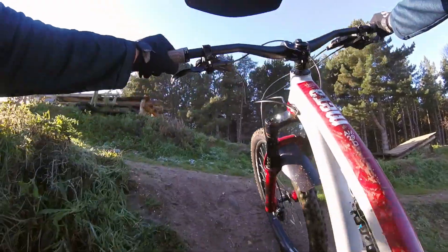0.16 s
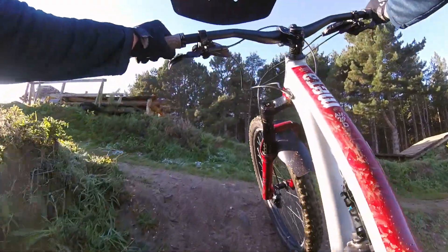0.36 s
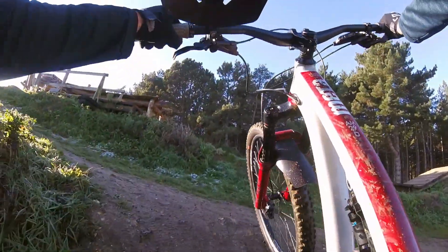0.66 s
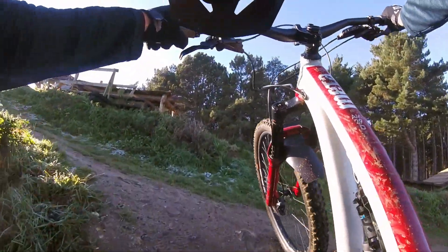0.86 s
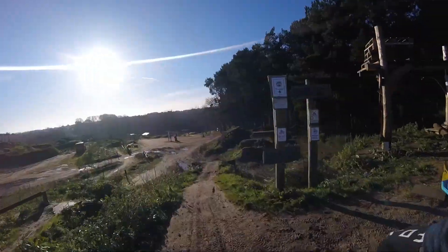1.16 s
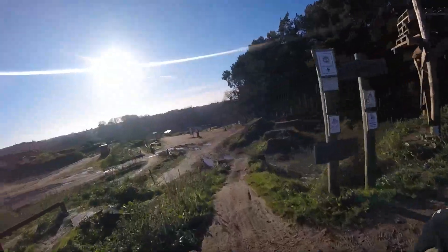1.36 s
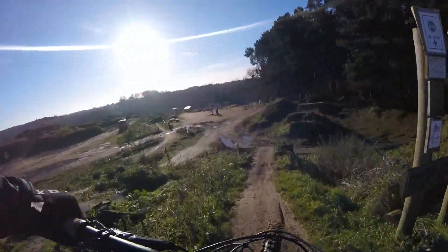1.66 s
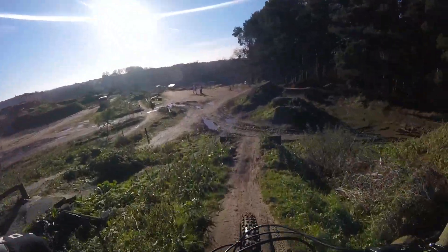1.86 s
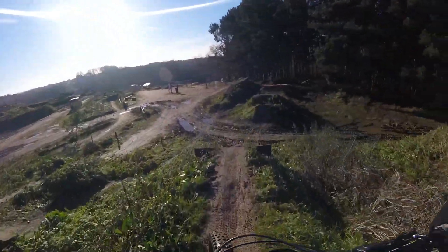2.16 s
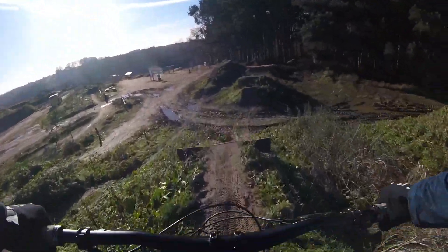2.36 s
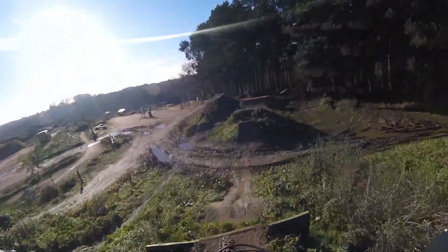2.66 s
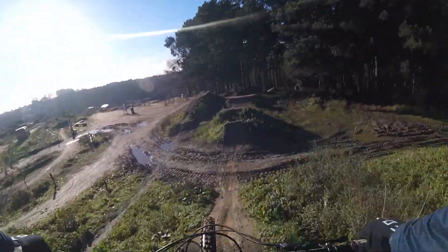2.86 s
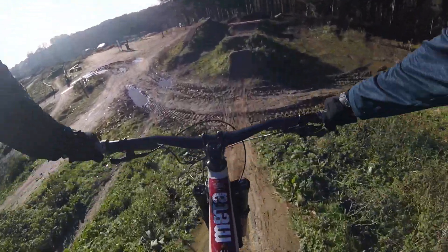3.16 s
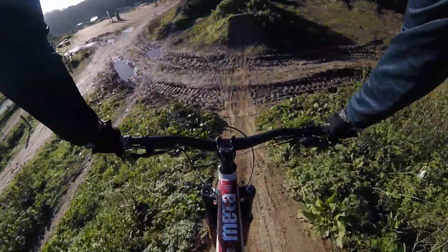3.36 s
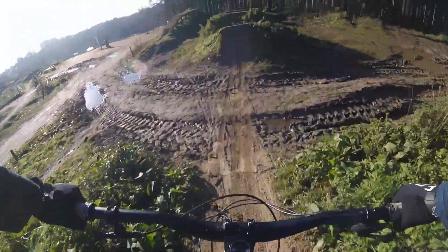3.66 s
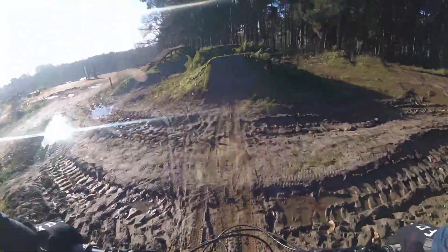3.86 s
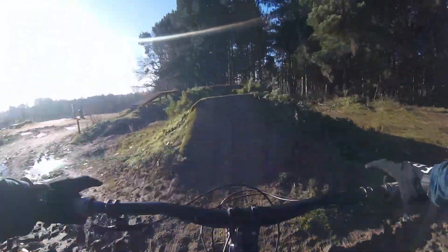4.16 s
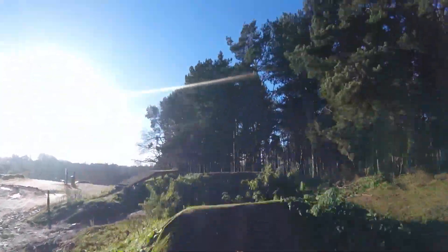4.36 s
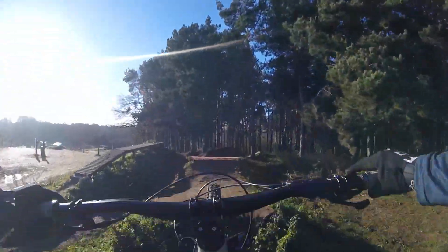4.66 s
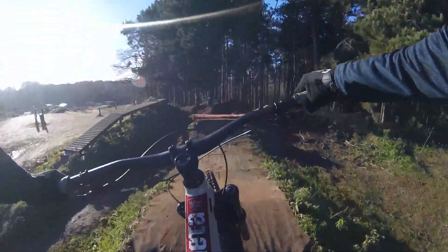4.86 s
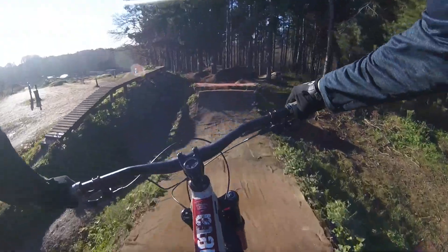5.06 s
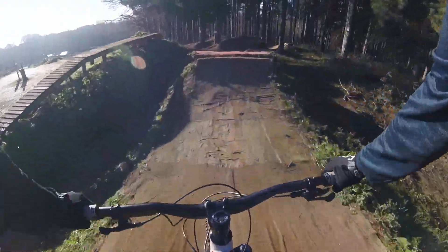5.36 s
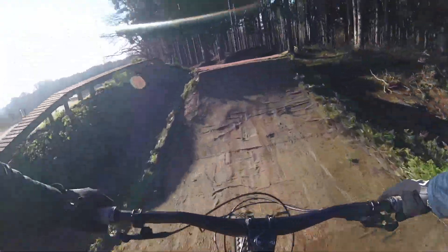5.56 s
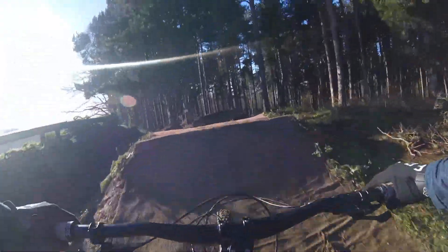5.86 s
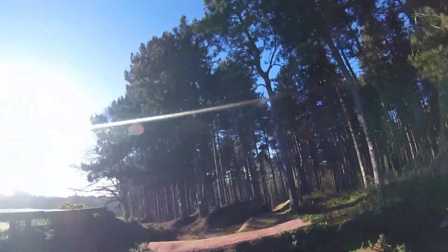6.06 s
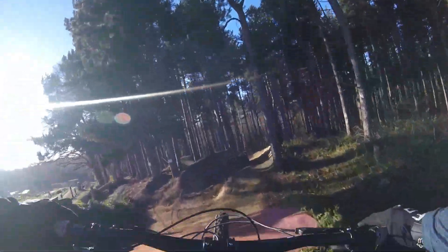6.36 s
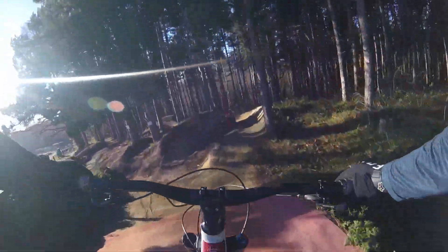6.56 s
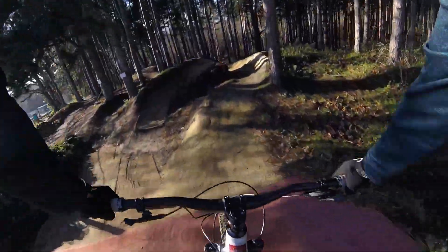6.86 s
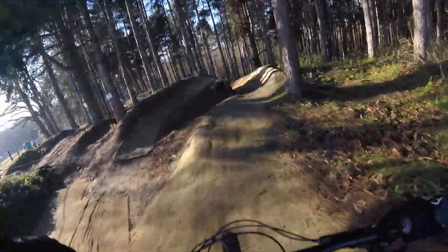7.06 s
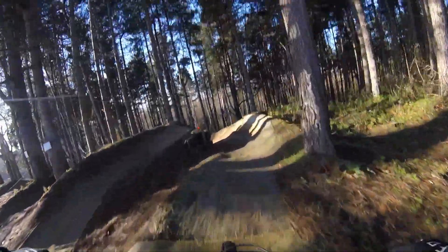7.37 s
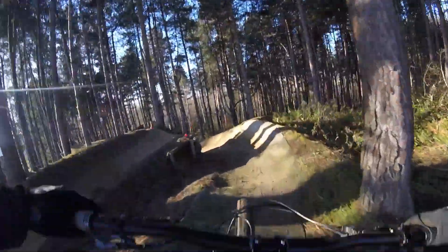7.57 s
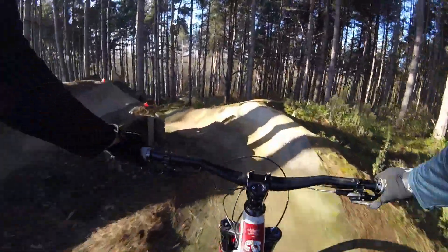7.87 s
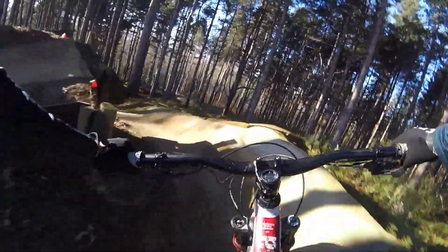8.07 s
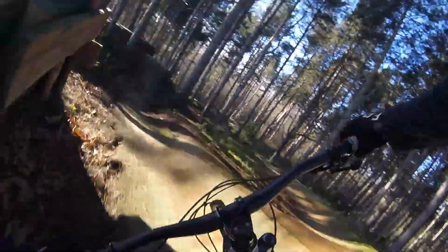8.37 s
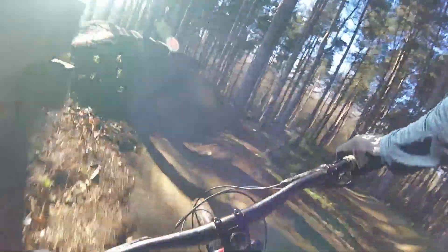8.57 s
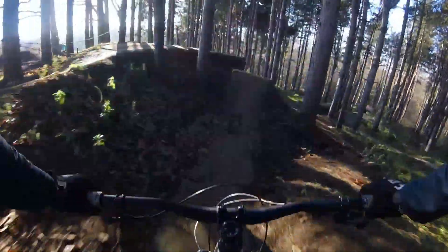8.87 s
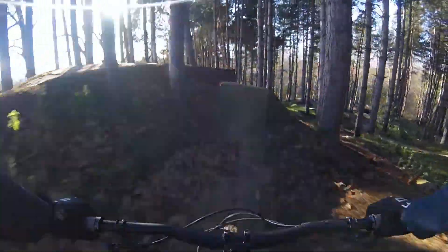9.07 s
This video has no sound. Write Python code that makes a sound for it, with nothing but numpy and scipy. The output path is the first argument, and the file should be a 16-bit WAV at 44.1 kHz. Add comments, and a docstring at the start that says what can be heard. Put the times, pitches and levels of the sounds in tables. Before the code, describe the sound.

A mountain bike's freehub ticks, then buzzes as the tyres roar over dirt and three jumps, with wind thumping on the microphone.

```python
"""Mountain bike on a dirt trail

Heard from a small cased camera on the rider: the freehub ticks as the wheel slows, then the bike runs
over packed dirt with three jumps. Turbulent wind rumbles and thumps on the microphone port; the tyres
roar, crunch and spit grit. Pawl impacts ring the hub, a buzz that is clearest while the wheels are in
the air. The cavity resonances of the case colour the pawls, grit and rattles."""
import sys
import numpy as np
from scipy import signal
from scipy.fft import rfft, irfft
from scipy.io import wavfile
from scipy.ndimage import uniform_filter1d

SR = 44100
rng = np.random.default_rng(int(sys.argv[2]) if len(sys.argv) > 2 else 0)


def int16_out(signal):
    """Quantize to a 16-bit WAV file."""
    q = np.round(np.clip(np.atleast_2d(signal).T, -1, 1) * 32767)
    wavfile.write(sys.argv[1], SR, q.astype(np.int16))


N = 406161

# faint wavering tones: (start [s], end [s], first pitch [Hz], last pitch [Hz], level [dB])
HUMS = [(0.242, 0.85, 360, 383, -53), (4.97, 5.322, 858, 913, -64)]
# wind on the port: (time [s], rumble [dB], buffeting [dB])
WIND_LEVELS = [(0, -39, -56.5), (.8, -40, -53.5), (1.3, -35, -54.5), (1.9, -36, -50.5), (2.3, -29, -39.5),
               (2.65, -26, -37), (2.9, -23, -39.5), (3.15, -30, -38.5), (3.4, -28, -37),
               (3.6, -23.5, -35.5), (4.2, -24.5, -37.5), (4.55, -27.5, -59), (4.75, -36, -26),
               (4.92, -26, -41), (5.0, -34.5, -47), (5.28, -33, -44.5), (5.4, -32.5, -41.5),
               (5.95, -25.5, -37.5), (6.5, -30.5, -40.5), (6.8, -26.5, -36.5), (7.0, -25.5, -38),
               (7.3, -23, -32.5), (7.55, -22, -27.5), (7.75, -25.5, -32), (7.95, -29.5, -36),
               (8.15, -27.5, -31), (8.4, -26, -33), (8.6, -25, -38), (9.21, -28, -32)]
# single puffs of rumble: (time [s], rise [dB])
PUFFS = [(.25, 12.5), (0.668, 9.5), (1.098, 9), (1.472, 13.5), (1.872, 13), (2.082, 1.5), (2.442, 3),
         (2.92, -0.5), (3.385, 8.5), (4.641, 9.5), (5.568, 7.5), (6.898, 7), (7.06, 6.5), (7.945, 7.5),
         (8.162, 8.5), (8.441, 4)]
# pressure pulses on the port: (time [s], level [dB], pitch [Hz])
THUMPS = [(0.495, -19, 250), (0.964, -20.5, 221), (1.074, -20, 55), (1.118, -25, 50), (1.454, -18, 58),
          (2.149, -17, 165), (2.427, -21.5, 133), (2.817, -24, 154), (2.855, -16, 143), (2.86, -12.5, 199),
          (3.051, -11, 133), (3.147, -24.5, 210), (3.279, -22, 149), (3.326, -11.5, 60), (3.344, -16, 60),
          (3.367, -16, 45), (3.405, -8.5, 97), (3.411, -20, 300), (3.426, -14, 45), (4.611, -8.5, 126),
          (4.622, -8, 184), (4.628, -12, 122.5), (4.634, -30, 159), (4.67, -22, 300), (4.696, -21, 241.7),
          (4.702, -9, 130), (4.709, -10, 170), (4.715, -6.5, 200.6), (4.721, -10, 272),
          (4.74, -14.5, 262.3), (4.749, -18, 223), (4.757, -13.5, 418), (4.766, -10, 129),
          (4.791, -12, 133), (4.821, -16, 240), (4.838, -15.5, 133), (4.877, -12, 133), (4.883, -12.5, 128),
          (4.922, -10, 136), (4.933, -21, 200), (4.939, -7, 215), (5.332, -26, 148), (5.39, -19.5, 146.2),
          (6.256, -17, 90), (6.403, -19.5, 89.8), (6.583, -21, 70.2), (6.872, -15, 70.1), (6.981, -18, 208),
          (6.988, -13.5, 198.4), (6.995, -21, 172), (7.03, -12, 45), (7.066, -13, 45), (7.086, -19, 195),
          (7.218, -20, 139.4), (7.453, -15, 157), (7.508, -10, 147), (7.522, -17, 70), (7.625, -12.5, 75),
          (7.782, -17, 129), (7.935, -13, 54.9), (8.092, -16, 348), (8.327, -11, 172.1),
          (8.344, -25, 254.3), (8.44, -16.5, 131), (8.551, -19.5, 265), (8.565, -16, 55.1),
          (8.591, -20, 45.17), (8.79, -19.5, 65), (9.02, -18, 65.14)]
# rattles, knocks and flicked stones: (time [s], strength [dB], centre [Hz], t60 [s], Q [ratio])
RATTLES = [(0.011, -9, 6840, 0.085, 1.9), (0.495, -11.5, 7500, .03, 1.4), (0.966, -17, 550, 0.024, 0.55),
           (1.016, -21, 2800, 0.058, 0.59), (1.036, -22.5, 2200, 0.077, 0.96), (1.078, -28, 2200, .06, 1.2),
           (1.115, -32, 1500, 0.053, .8), (1.348, -22, 4800, .02, 1.1), (1.381, -9.5, 2230, 0.018, 1.1),
           (1.475, -21.5, 2450, 0.21, 1), (2.119, -17.5, 6450, 0.11, 2.6), (2.232, -21, 8000, .04, 1.2),
           (2.492, -20, 5200, .05, 2.5), (3.149, -10.5, 713, 0.037, 2.5), (3.466, -17.5, 1500, 0.046, 0.83),
           (3.473, -12, 8000, 0.018, 1.2), (3.495, -12, 6500, 0.022, 1.3), (3.515, -16.5, 1500, .04, 0.69),
           (3.53, -15.5, 650, .09, 1.2), (3.546, -12, 1400, .035, 0.7), (3.544, -8, 6900, .02, 2.2),
           (3.566, -15, 1510, 0.032, 0.83), (3.566, -13, 6500, 0.037, 1.1), (3.655, 1, 8400, 0.016, 5.4),
           (3.769, -9.5, 1760, 0.037, 1.1), (3.969, -12.5, 6496, 0.061, 0.95), (4.283, -7, 3000, .025, .7),
           (4.283, -5, 6500, .04, 1.5), (4.539, -5, 6405, 0.075, 1.9), (5.333, -17, 2188, 0.046, 1.5),
           (6.168, -12.5, 5030, 0.12, 2.2), (6.374, -22, 1000, 0.02, .9), (6.952, -20, 1493, 0.06, .8),
           (6.983, -14, 900, 0.075, .7), (6.986, -18, 1900, .07, .7), (6.991, -19, 6000, .03, .7),
           (6.999, -16, 5200, .02, 1.1), (7.008, -19, 1240, .07, 1.1), (7.019, -15, 2400, .03, 0.77),
           (7.026, -15, 6800, .03, 1.3), (7.033, -6, 1850, 0.022, 1.8), (7.046, -16, 1600, 0.03, 1.2),
           (7.046, -6, 6500, .02, 2.7), (7.051, -7, 8160, 0.022, 1.3), (7.053, -14, 2600, 0.037, 0.71),
           (7.087, -18.5, 3500, 0.029, 0.4), (7.364, -16, 760, 0.054, 1.2), (7.978, -25, 6010, 0.022, 1.04),
           (8.269, -14, 6600, 0.052, 1.3), (8.365, -19, 950, .03, 2.44), (8.459, -11, 6500, .058, 1.2),
           (8.547, -17.5, 750, 0.09, 0.75), (8.56, -19, 700, 0.084, 0.79), (8.569, -18, 1900, .025, 1.5),
           (8.803, -14, 1950, 0.03, 2.5), (8.903, -17.5, 1500, 0.12, 1.4), (8.908, -24, 904, 0.028, 0.88),
           (9.01, -17, 1500, 0.042, .6), (9.071, -10.5, 1700, 0.044, 0.97), (9.146, -14.5, 1600, 0.043, .8)]
# tyre sound, following load and surface: (time [s], casing roar [dB], tread crunch [dB])
TYRE_LEVELS = [(0, -35.5, -39), (.08, -59, -67.5), (.35, -46, -44.5), (.6, -52.5, -75), (1.0, -51.5, -48.5),
               (1.5, -47, -46.5), (2.1, -52.5, -55), (2.45, -48, -49.5), (2.62, -44.5, -43.5),
               (2.8, -43, -47), (3.5, -34.5, -48.5), (3.8, -39, -42.5), (4.0, -31, -37.5), (4.3, -31, -37),
               (4.5, -33.5, -38.5), (5.35, -42, -74), (5.55, -39, -47), (5.75, -37, -43.5), (5.9, -34, -42),
               (6.05, -31, -44), (6.2, -39.5, -46.5), (7.0, -35, -47), (7.4, -30.5, -42), (7.6, -39, -51),
               (7.85, -43.5, -48.5), (8.12, -26.5, -38.5), (8.3, -39, -45.5), (8.46, -36.5, -43),
               (8.53, -38, -52), (8.62, -43.5, -58), (8.84, -46, -62), (8.9, -36.5, -45),
               (9.21, -38.5, -41.5)]
# jumps: (take-off [s], landing [s], landing crunch [dB], hush in flight [dB], time to leave the lip [s])
JUMPS = [(2.852, 3.469, -39, -55, 0.1), (4.585, 5.328, -43, -60, .05), (6.204, 6.951, -41.5, -53.5, 0.13)]
# grit and coasting freehub together, ahead of the case: (time [s], level [dB])
TREBLE_LEVEL = [(0, -37.5), (1.0, -38), (1.5, -37), (2.0, -39.5), (2.25, -38.5), (2.6, -36), (2.625, -23),
                (2.8, -22.5), (2.93, -26.5), (3.14, -28), (3.2, -23), (3.38, -24), (3.43, -33), (3.48, -27),
                (3.57, -26), (3.85, -23), (4.0, -18), (4.3, -19.5), (4.48, -22), (4.57, -20.5), (4.64, -31),
                (4.95, -35.5), (5.3, -36), (5.36, -29.5), (6.15, -26.5), (6.28, -28), (6.82, -28),
                (7.12, -28), (7.7, -26), (7.95, -26), (8.05, -22), (8.35, -22), (8.5, -19), (8.62, -20),
                (8.87, -23.5), (9.21, -21.5)]
# ticks of the slowing wheel: (time [s], relative level [dB], gain of the dull part [dB])
TICKS = [(0.0054, -2.5, -1.5), (0.046, 0, 0.5), (0.0873, 0, -2.5), (0.1328, -1, -6), (0.1763, 0.5, -0.5),
         (0.223, -1, -4), (0.271, -1, -2), (0.322, 1.5, -0.5), (0.376, 1, -0.5), (0.432, 1, -3),
         (0.4925, 1.5, 2), (0.551, -0.5, -1), (0.609, -1.5, -1), (0.6749, 1, -2), (0.751, -0.5, 0),
         (0.827, -0.5, 0), (0.908, -2, 3.5), (0.992, -2, 3)]
# pawl impacts while coasting: (time [s], click rate [Hz])
CLICK_RATE = [(2.69, 65.5), (3.13, 57.75), (3.46, 58.6), (3.68, 75.3), (4.18, 90.4), (4.61, 90.7),
              (4.83, 73.4), (4.96, 74.6), (5.27, 84.4), (5.76, 116.3), (6.08, 115), (6.37, 76.4),
              (6.48, 70.5), (6.91, 74.2), (7.27, 117.4), (7.42, 114.7), (7.77, 87.9), (8.19, 96.5),
              (8.43, 111.1), (8.64, 93.6), (8.93, 87.85), (9.21, 100)]
# modes of the hub: (frequency [Hz], relative level [dB], t60 before added damping [s])
HUB_MODES = [(2300, -11.5, 0.064), (2640, -14.5, 0.041), (4980, -8, 0.03), (5300, -21, 0.038),
             (6100, -11, .04), (6396, 0.5, 0.048), (6642, -0.5, 0.048), (7090, -3, 0.047),
             (7620, -1.5, 0.045), (7900, -10.5, .03), (8180, -5, 0.053), (8750, -7, 0.089),
             (9360, -9.5, 0.07)]
# ring of the hub shell: (time [s], level against the pawls [dB], lean to its upper resonances [dB])
SHELL_LEVELS = [(2.6, -17.5, -8), (2.9, -18, 0), (3.15, -16, 3), (3.45, -14.5, -1), (4.0, -20.5, 0),
                (4.6, -18.5, 1.5), (5.0, -19, -1), (5.3, -14.5, 1), (6.2, -19.5, -2), (6.35, -21, -1),
                (6.46, -21, 3), (6.6, -12, 2), (6.72, -14.5, -5), (6.8, -10.5, -1.5), (6.95, -19.5, 0),
                (7.6, -17, -2.5), (8.3, -17, 1), (8.55, -23.5, -2), (8.72, -17, -2.5), (9.21, -14.5, 1)]
# resonances of the camera case: (frequency [Hz], width [Hz], gain [dB])
CASE_MODES = [(580, 980, 5), (1420, 570, -3.5), (2250, 680, -6.5), (2714, 450, -2), (3500, 850, -10.5),
              (5040, 850, -5), (6522, 300, -7.5), (6970, 1620, -11), (8720, 1220, -9.5), (10130, 1170, -6)]
# microphone response: (frequency [Hz], gain [dB])
MIC_RESPONSE = [(9300, -0.5), (9800, -13), (10300, -72.5), (13000, -43.5)]
# faint high hiss, rising and falling: (time [s], level [dB])
HISS_LEVEL = [(0, -74), (1.0, -76), (1.03, -65), (1.6, -67), (2.58, -68), (2.64, -77), (4.5, -78),
              (4.7, -83), (5.5, -78), (8.7, -77), (9.21, -76)]

# spectral envelopes, each (frequency [Hz], relative density [dB])
RUMBLE_SPECTRUM = [(8, -30), (14, -1), (25, 0), (40, -1), (65, -4), (95, -12), (140, -24), (250, -50)]  # large eddies
BUFFET_SPECTRUM = [(45, -15), (70, -1), (95, 2.5), (130, 0), (200, -6.5), (350, -15), (700, -32),
                   (1500, -54.5)]  # small eddies
RAGGED_SPECTRUM = [(120, -9.5), (250, 1), (600, -7), (1100, -21), (1500, -35), (2500, -52.5)]  # turbulence on a thump
CASING_SPECTRUM = [(150, -11.5), (240, 3.5), (320, -1), (400, -1), (480, -1), (570, -5), (750, -16.5),
                   (1200, -17.5), (2500, -48.5)]  # tyre casings
TREAD_SPECTRUM = [(350, -19.5), (700, -2.5), (1100, -8), (1600, -4), (2200, -6), (3200, -9), (5000, -20.5)]  # tread on dirt
GRIT_SPECTRUM = [(600, -28.5), (1500, -15), (2400, -8), (4000, -7), (6500, 5), (9500, -3.5)]  # thrown grit
TICK_SPECTRUM = [(600, -40), (1500, -13), (2400, -7.5), (4000, -8.5), (7000, 14), (9500, 3)]  # pawls on the slow wheel
PAWL_SPECTRUM = [(1500, -43.5), (3000, -5), (4500, -9), (6500, 3.5), (9500, 1.5)]  # pawls on the fast wheel
SHELL_SPECTRUM = [(600, -30), (900, -12), (1200, -26.5), (1650, -8.5), (1950, -10), (2280, 1), (2550, -5.5),
                  (2800, -2.5), (3100, -18.5), (4200, -34)]  # hub shell
HISS_SPECTRUM = [(9000, -22), (10400, -10), (11500, 1.5), (12800, 11.5), (13600, -0.5)]  # faint high hiss around 12-13 kHz

GUSTS_PER_S, GUST_DB, PUFF_S = 13, 2.5, 0.038
RAGGED_DB, RAGGED_GROWTH, RAGGED_DB_PER_OCTAVE = -11, 1.12, 8.5  # strong, quick thumps are the roughest
TOUCH_S, CRUNCH_S = 0.0057, 0.11  # on landing the tyres bite at once, then the crunch dies away
AIRBORNE_TYRE_DB, AIR_HUSH_DB = -22.5, -52.5
COAST_S = 2.61  # pedalling stops, the freehub starts to buzz
GROUND_SHARE, AIR_SHARE = .4, .76  # the freehub's share of the treble power
TICKS_DB, TICK_RISE_S, TICK_DECAY_S = -29, 0.0032, 0.052
TICK_RING_DB, BUZZ_RING_DB, MODE_SCATTER_DB = -4.5, 0.5, 3.5  # ring against pawl hiss; its spread
TOOTH_JITTER, TOOTH_SCATTER_DB = .06, 1.6  # timing spread as a share of a tooth; strength spread
TICK_SPLIT_HZ, SHELL_SPLIT_HZ, TOP_HZ = 4200, 2460, 13900

TIME = np.arange(N) / SR
GRID_HZ = np.maximum(np.arange(2049) * SR / 4096, 5)


def undb(db):
    """Amplitude ratio of a level in decibels."""
    return 10 ** (np.asarray(db) / 20)


def unit(x):
    """Normalisation to rms 1."""
    return x / np.sqrt(np.mean(x ** 2))


def curves(table):
    """Linear interpolation of each column over time, one value a sample."""
    times, *columns = np.transpose(table)
    return [np.interp(TIME, times, column) for column in columns]


def add(out, start_s, piece):
    """Superposition of a piece from its start time on."""
    i = int(start_s * SR)
    out[i:i + len(piece)] += piece[:N - i]


def colour(x, gain_db, size=4096):
    """Minimum-phase filtering by gains on GRID_HZ, through the folded cepstrum."""
    cepstrum = irfft(gain_db * np.log(10) / 20, size)
    cepstrum[1:size // 2] *= 2
    cepstrum[size // 2 + 1:] = 0
    return signal.fftconvolve(x, irfft(np.exp(rfft(cepstrum)), size))[:N]


def filtered(x, response):
    """Filtering by a response interpolated over log frequency."""
    hz, db = np.transpose(response)
    return colour(x, np.interp(np.log(GRID_HZ), np.log(hz), db))


def shaped(x, spectrum):
    """Source-filter model: an excitation takes on a spectral envelope, at rms 1."""
    return unit(filtered(x, spectrum))


def walk(rate):
    """Slow random modulation: values held 1 / rate seconds and smoothed twice, at rms 1."""
    hold = int(SR / rate)
    steps = np.repeat(rng.standard_normal(N // hold + 1), hold)
    return unit(uniform_filter1d(uniform_filter1d(steps, hold), hold)[:N])


def grainy_noise(spectrum, rate, spread_db, smooth):
    """Shot noise: sparse random impulses over Gaussian noise of relative rms `smooth`, then shaped."""
    hits = (rng.random(N) < rate / SR) * rng.standard_normal(N)
    sizes = undb(np.minimum(spread_db * rng.exponential(size=N), 9))
    return shaped(unit(hits * sizes) + smooth * rng.standard_normal(N), spectrum)


def hums():
    """Narrow-band noise: random modulation in quadrature makes faint, gliding tones waver."""
    out = np.zeros(N)
    for start, end, from_hz, to_hz, db in HUMS:
        progress = np.linspace(0, 1, int((end - start) * SR))
        phase = 2 * np.pi * np.cumsum(from_hz + (to_hz - from_hz) * progress) / SR
        in_phase, quadrature = walk(rate=55)[:len(phase)], walk(rate=55)[:len(phase)]
        fade = np.minimum(10 * np.sin(np.pi * progress), 1)
        add(out, start, undb(db) * fade * (in_phase * np.cos(phase) + quadrature * np.sin(phase)))
    return out


def wind():
    """Turbulent pressure fluctuation: in gusts, large eddies rumble and small ones burst on the port."""
    rumble_db, buffet_db = curves(WIND_LEVELS)
    puff_db = sum(db * np.exp(-((TIME - s) / PUFF_S) ** 2) for s, db in PUFFS)
    gust_db = GUST_DB * walk(GUSTS_PER_S) + puff_db
    rumble = shaped(rng.standard_normal(N), RUMBLE_SPECTRUM) * undb(rumble_db + gust_db)
    eddies = grainy_noise(BUFFET_SPECTRUM, rate=500, spread_db=3.44, smooth=0.85)
    return rumble + eddies * undb(buffet_db + 0.2 * gust_db + 3.14 * walk(25))


def thumps():
    """Pressure transients on the port: each lasts a cycle or two and carries ragged turbulence."""
    pulses, turbulence = np.zeros(N), np.zeros(N)
    for (s, db, hz), (polarity, skew) in zip(THUMPS, rng.random((len(THUMPS), 2))):
        cycles = np.arange(-.7, 2.5, hz / SR)
        window = np.exp(-(cycles / np.where(cycles < 0, .3, .55)) ** 2)
        wave = np.cos(2 * np.pi * (cycles + skew / 4)) * window
        add(pulses, s, np.sign(polarity - .5) * undb(db) * wave)
        ragged_db = RAGGED_GROWTH * db + RAGGED_DB + RAGGED_DB_PER_OCTAVE * np.log2(hz / 200)
        ragged_window = np.exp(-(cycles / np.where(cycles < 0, .4, 1.1)) ** 2)
        add(turbulence, s, undb(ragged_db) * ragged_window)
    return pulses + turbulence * shaped(rng.standard_normal(N), RAGGED_SPECTRUM)


def rattles():
    """Impact excitation: each knock is a decaying noise burst through a broad resonance."""
    out, t = np.zeros(N), np.arange(3000) / SR
    for s, db, hz, t60, q in RATTLES:
        band = signal.iirpeak(hz, q, SR)
        envelope = np.exp(-np.log(1000) * t / t60) + 0.72 * np.exp(-t / 0.00022)
        burst = envelope * rng.standard_normal(len(t))
        add(out, s, undb(db) * signal.lfilter(*band, signal.lfilter(*band, burst)))
    return out


def jumps():
    """Loss and return of contact: the airborne share (0-1) and the amplitude of hush and landings."""
    airborne, crunch, hush_db = np.zeros(N), np.zeros(N), np.full(N, AIR_HUSH_DB)
    for up, down, crunch_db, flight_db, lift_s in JUMPS:
        flight = np.clip((TIME - up) / lift_s, 0, 1) * np.clip((down - TIME) / TOUCH_S, 0, 1)
        airborne += flight
        hush_db += (flight_db - AIR_HUSH_DB) * flight
        crunch += (TIME > down) * undb(crunch_db) * np.exp(-((TIME - down) / CRUNCH_S) ** 2)
    return airborne, np.hypot(crunch, undb(hush_db))


def tyres(airborne, hush_and_landings):
    """Rolling contact noise: casings roar and tread crunches on the dirt, and both fall away in flight."""
    roar_db, tread_db = curves(TYRE_LEVELS)
    contact = undb(AIRBORNE_TYRE_DB * airborne)
    roar = grainy_noise(CASING_SPECTRUM, rate=400, spread_db=1, smooth=1)
    roar *= contact * undb(roar_db + 2.82 * walk(16))
    tread = grainy_noise(TREAD_SPECTRUM, rate=900, spread_db=5.9, smooth=1.13) * undb(2.62 * walk(20))
    return roar + tread * np.hypot(contact * undb(tread_db), hush_and_landings)


def grit():
    """Shot noise: many small impacts of grit thrown off the knobs merge into a flickering hiss."""
    return grainy_noise(GRIT_SPECTRUM, rate=1500, spread_db=2.6, smooth=1.6) * undb(1.73 * walk(25))


def hub_ring(blows, redraw_hz, t60_scale, detune):
    """Modal resonance: blows drive the hub's damped modes, each with a randomly changing strength."""
    out, hold = 0, int(SR / redraw_hz)
    for hz, db, t60 in HUB_MODES:
        mode_hz = hz * (1 + detune * rng.standard_normal())
        pole = np.exp(2j * np.pi * mode_hz / SR - np.log(1000) / (t60_scale * t60 * SR))
        strengths = undb(db + MODE_SCATTER_DB * rng.standard_normal(len(blows) // hold + 1))
        drive = blows * np.repeat(strengths, hold)[:len(blows)]
        out += signal.lfilter([pole.imag, 0, -pole.imag], [1, -2 * pole.real, abs(pole) ** 2], drive)
    return unit(out)


def freehub_ticks():
    """Separate impacts: the pawls drop within a few ms, the last hardest, and the snap rings the hub."""
    snaps, rings, t = np.zeros(N), np.zeros(N), np.arange(4000) / SR
    rise = np.minimum(t / TICK_RISE_S, 1) ** 0.89
    decay = np.log(1000) * np.maximum(t - TICK_RISE_S, 0) / TICK_DECAY_S
    envelope = rise * (np.exp(-decay / 0.5) + 0.29 * np.exp(-decay / 1.7))  # quick drop, slower tail
    lowpass = signal.butter(2, TICK_SPLIT_HZ, fs=SR)
    for s, db, dull_db in TICKS:
        snap = envelope * rng.standard_normal(len(t))
        snap += (undb(dull_db) - 1) * signal.lfilter(*lowpass, snap)
        add(snaps, s, undb(db) * snap)
        add(rings, s, undb(db) * hub_ring(snap, redraw_hz=10, t60_scale=0.57, detune=.025))
    return undb(TICKS_DB) * unit(shaped(snaps, TICK_SPECTRUM) + undb(TICK_RING_DB) * unit(rings))


def ratchet(decay_s):
    """Quasi-periodic excitation: one noise burst a tooth, each of its own timing and strength."""
    (click_hz,) = curves(CLICK_RATE)
    teeth = np.cumsum(click_hz) / SR + 1 + TOOTH_JITTER * walk(45)
    strengths = undb(TOOTH_SCATTER_DB * rng.standard_normal(int(teeth.max()) + 1))
    since_s = teeth % 1 / click_hz
    envelope = np.minimum(since_s / .0022, 1) * np.exp(-since_s / decay_s) + .06
    return strengths[teeth.astype(int)] * envelope * rng.standard_normal(N)


def hub_shell():
    """Forced vibration: the ratchet drives the shell's lower resonances, which swell and shift."""
    level_db, lean_db = curves(SHELL_LEVELS)
    ring = shaped(ratchet(decay_s=0.0069), SHELL_SPECTRUM)
    low = signal.sosfiltfilt(signal.butter(3, SHELL_SPLIT_HZ, fs=SR, output="sos"), ring)
    lean_db += 1.8 * walk(9)
    return (low * undb(-lean_db) + (ring - low) * undb(lean_db)) * undb(level_db + 1.2 * walk(12))


def freehub_buzz():
    """Rapid impacts fuse into a bright buzz; the dragging pawls damp the modes that they excite."""
    blows = ratchet(decay_s=.003)
    ring = hub_ring(blows, redraw_hz=60, t60_scale=.24, detune=0)
    return unit(shaped(blows, PAWL_SPECTRUM) + undb(BUZZ_RING_DB) * ring)


def camera_case(x):
    """Cavity resonance: airborne sound reaches the microphone through the modes of the case."""
    power = sum(undb(2 * db) / (1 + (2 * (GRID_HZ - hz) / width) ** 2) ** 2
                for hz, width, db in CASE_MODES)
    return colour(x, 10 * np.log10(power + undb(-43.5)))


def scene():
    """Superposition of incoherent sources; freehub and grit divide the treble power between them."""
    airborne, hush_and_landings = jumps()
    rolling = tyres(airborne, hush_and_landings)
    spray, shell, buzz = grit(), hub_shell(), freehub_buzz()
    treble = undb(curves(TREBLE_LEVEL)[0] + walk(14))
    hub_share = (TIME > COAST_S) * (GROUND_SHARE + (AIR_SHARE - GROUND_SHARE) * airborne)
    hub_gain, grit_gain = treble * np.sqrt(hub_share), treble * np.sqrt(1 - hub_share)
    direct = wind() + thumps() + hums() + rolling + hub_gain * shell
    through_case = camera_case(grit_gain * spray + hub_gain * buzz + freehub_ticks() + rattles())
    return (direct + through_case)[None]


def record(dry):
    """Saturation and band limiting round the peaks and cut the top; a faint high hiss rises and falls."""
    heard = filtered(np.tanh(1.5 * dry[0]) / 1.5, MIC_RESPONSE)
    hiss_db = curves(HISS_LEVEL)[0] + 2.5 * walk(7.3)
    hiss = undb(hiss_db) * shaped(rng.standard_normal(N), HISS_SPECTRUM)
    lowpass = signal.ellip(8, .3, 60, TOP_HZ, fs=SR, output="sos")
    return signal.sosfilt(lowpass, heard + hiss)[None]


dry = scene()
out = record(dry)
int16_out(out)
```